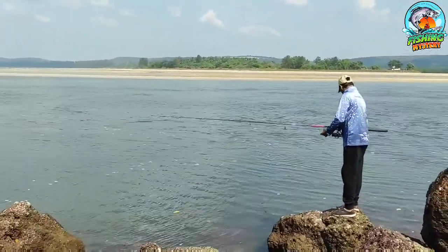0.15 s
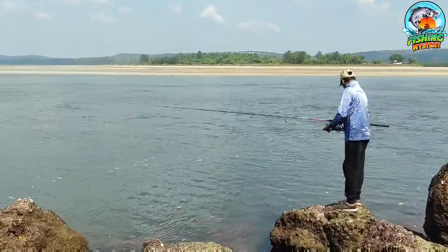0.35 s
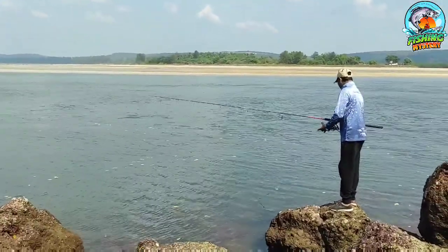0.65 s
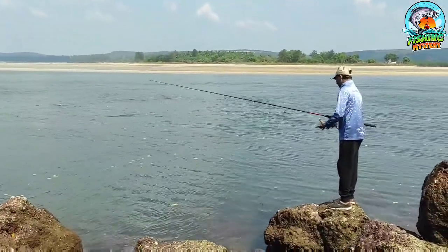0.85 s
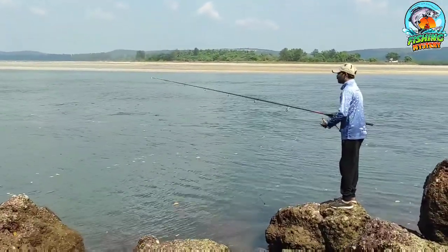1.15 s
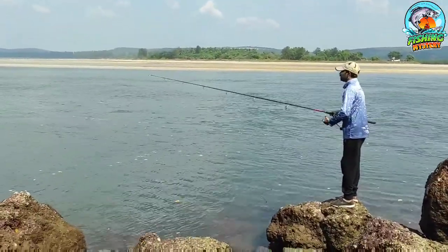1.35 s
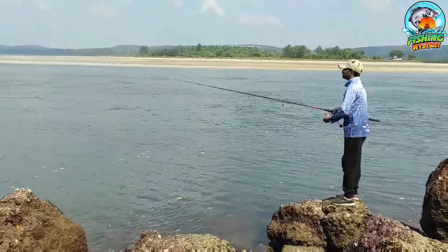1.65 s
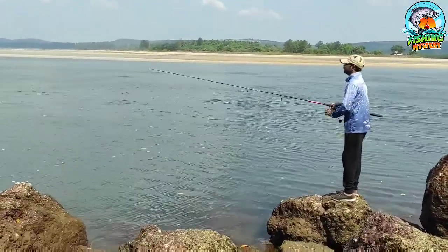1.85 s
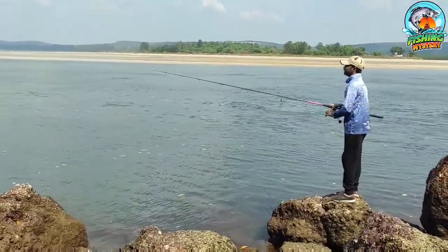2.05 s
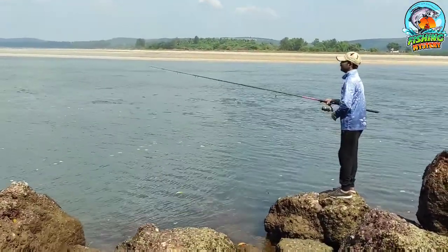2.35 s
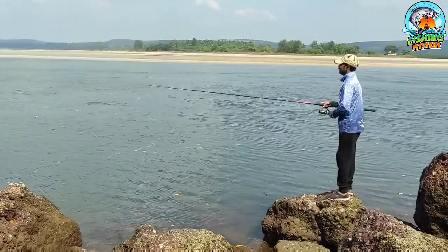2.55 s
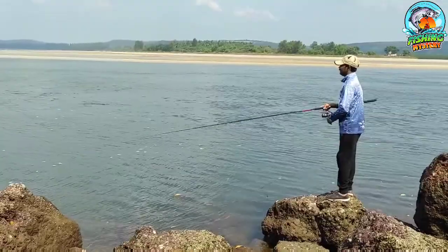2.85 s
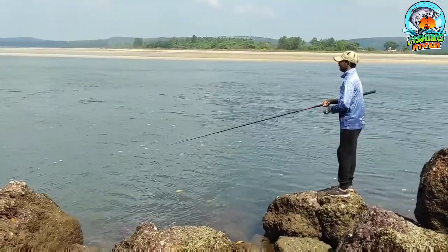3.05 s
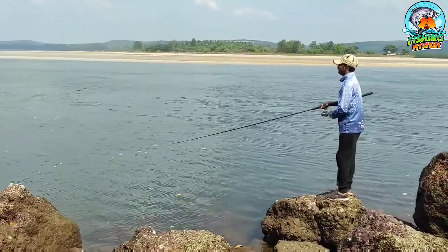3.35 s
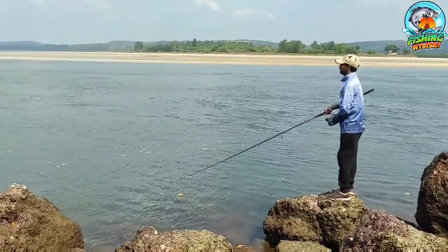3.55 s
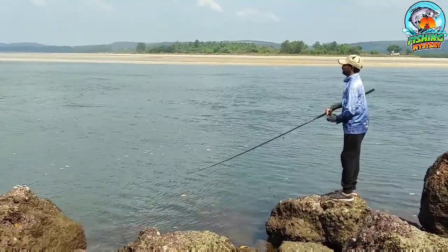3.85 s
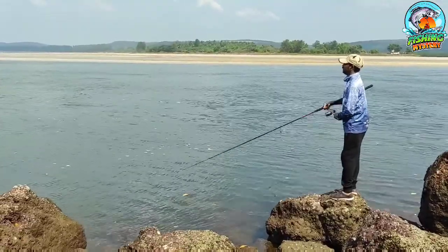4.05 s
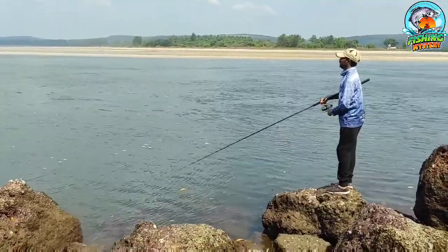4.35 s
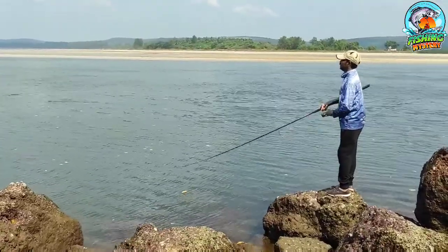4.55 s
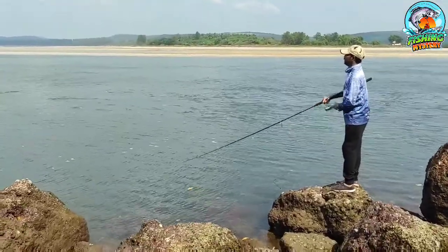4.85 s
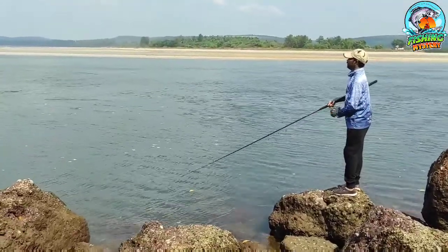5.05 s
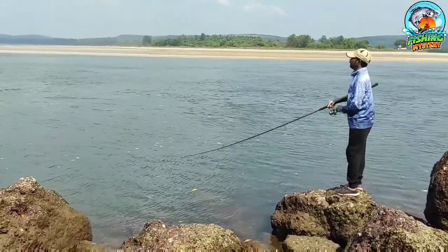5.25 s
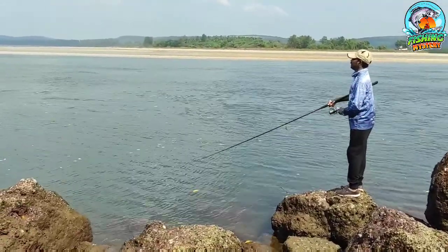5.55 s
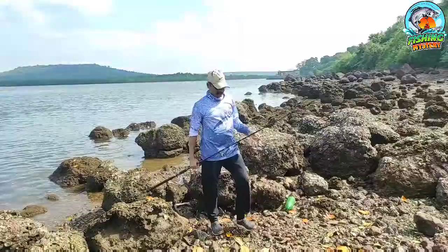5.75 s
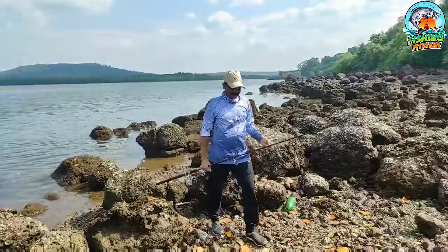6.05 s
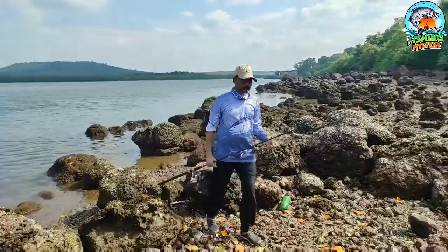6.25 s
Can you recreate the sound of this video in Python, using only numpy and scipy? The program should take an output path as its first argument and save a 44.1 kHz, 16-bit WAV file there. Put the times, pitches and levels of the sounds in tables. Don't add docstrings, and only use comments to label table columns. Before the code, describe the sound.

Wind pushes softly at a small outdoor microphone while water hushes and foam fizzes faintly. Pure, thin bird whistles sweep upward one after another, most ending in a tiny tick, with a roughened echo; fainter distant notes fall in pitch. Dry little fishing-reel clicks dot the scene. After a short silence comes a deep gust, louder wash, boot crunches on loose stones and a final hard knock.

```python
import sys
import numpy as np
from scipy import signal
from scipy.fft import rfft, irfft, next_fast_len
from scipy.io import wavfile
from scipy.ndimage import uniform_filter1d, map_coordinates

SR = 44100
rng = np.random.default_rng(int(sys.argv[2]) if len(sys.argv) > 2 else 0)


def field_ratio(decibels):
    return 10 ** (np.asarray(decibels, dtype=float) / 20)


def generate_wav(signal):
    frames = np.transpose(np.atleast_2d(signal))
    scaled = np.clip(frames, -1, 1) * 32767
    pcm = np.round(scaled).astype(np.int16)
    wavfile.write(sys.argv[1], SR, pcm)


N = 282226
TIME_S = np.arange(N) / SR

# (time [s], level [dB])
WIND = [(0, -32.5), (.3, -40.5), (.6, -36.5), (.72, -49.5), (.97, -35), (1.5, -46.5), (1.84, -34.5),
        (2.3, -35.5), (3.3, -44), (3.7, -37), (4.16, -36), (4.75, -38), (5.3, -37), (5.5, -33),
        (5.72, -41.5), (5.91, -9), (6.03, -19), (6.4, -15)]
# (frequency [Hz], density [dB per Hz])
SURGE_SPECTRUM = [(2, -30), (3, 1), (13, -1), (24, -14), (32, -23), (45, -60), (70, -120)]
# (frequency [Hz], density [dB per Hz])
RUMBLE_SPECTRUM = [(8, -120), (15, -35), (25, -2.5), (38, -7.5), (60, -7.5), (86, -17), (170, -31.5),
                   (300, -38.5), (600, -120)]
# (time [s], pressure [full scale], width [s])
PUSHES = [
    (5.728, .026, .03),
    (5.851, .075, .012),
    (5.875, .115, .013),
    (5.912, -.27, .016),
]
GUST_DB, RUMBLE_DB, RUMBLE_GROWS = 1.73, -56.5, 0.64

# (frequency [Hz], density [dB per Hz])
WASH_SPECTRUM = [(59, -23), (100, -2), (180, -7.5), (269, -2), (679, -3), (952, -9.5), (1610, -17),
                 (2070, -13.5), (3030, -17), (3590, -16.5), (4430, -30), (6200, -31.5), (8870, -35),
                 (12200, -34.5), (15500, -36)]
WASH_DB, HUSHED_DB, RECOVERED_DB = -58.5, -61, -51.5
STOP_S, RETURN_S, RECOVER_S = 5.7408, 5.86, 0.19
# (time [s], level [dB])
FOAM = [(0, -78), (.6, -85), (1.9, -81), (3.2, -78.5), (3.6, -73.5), (4.3, -74.5), (5.7, -74), (5.86, -73),
        (6.03, -67), (6.4, -65)]
# (frequency [Hz], density [dB per Hz])
FIZZ_SPECTRUM = [(2000, -62), (3000, -10), (5300, -5), (6300, 2.5), (7200, -11.5), (9000, -12),
                 (13000, -19)]

# (time [s], peak [dB], bright centre [Hz], low part [dB], length [s])
CLICKS = [(0.0345, -50, 6200, -20, 0.011), (1.741, -57, 8210, -13, 0.003),
          (1.754, -51.5, 6400, -25, 0.0024), (1.8367, -56, 7000, 1, 0.0025),
          (1.8826, -53, 6130, -15, 0.002), (1.9969, -55, 6640, -10, 0.001), (2.0188, -48, 8600, 0, 0.0016),
          (2.101, -50, 6960, -1, 0.0069), (2.718, -54.5, 7200, -21, 0.002),
          (2.9636, -50.5, 6740, 0, 0.0049), (2.974, -53.5, 6540, 0, 0.0071),
          (3.2445, -60.5, 9000, -20, .002), (3.62, -55.5, 6130, -16, 0.0053), (5.043, -58, 6400, -3, 0.003),
          (5.3672, -52.5, 5400, -7, 0.0013)]
# (time [s], peak [dB])
FAINT_CLICKS = [(.047, -62), (.5008, -65), (.516, -61.5), (.5761, -64), (.956, -62), (1.7644, -63), (2.2094, -63),
                (2.219, -62), (2.545, -60), (3.033, -60), (3.0535, -62), (3.0624, -68), (3.071, -66), (3.151, -63),
                (3.172, -66), (3.337, -65), (3.571, -59.5), (4.46, -60), (4.834, -75), (5.3223, -59), (5.689, -62)]
FAINT_HZ, FAINT_LOW_DB, FAINT_S = 6300, -1, 0.003
# (frequency [Hz], width [Hz], level [dB])
HOUSING = [(3570, 646, 10.5), (6130, 360, -1.5), (9000, 530, -12), (1500, 965, 10.5), (11700, 2700, -19)]

# (start [s], end [s], last pitch [Hz], climb [Hz per s], last level [dB])
WHISTLES = [
    (0.703, 1.01, 5205, 1200, -58),
    (1.504, 1.781, 5346, 1670, -56.5),
    (2.291, 2.556, 5313, 1595, -53),
    (3.588, 3.886, 5293, 1254, -55),
    (4.876, 5.171, 5194, 710, -55),
]
# (pitch [Hz], width [Hz], depth [dB], octave change [dB])
NULLS = [(4900, 64, 2.5, -5), (4970, 60, 17, -4), (5010, 144, 8, 1), (4920, 53, 4, 2), (4763, 41, 16, -1)]
# (time [s], level [dB], pitch [Hz], overtone [dB])
BILL_TICKS = [
    (1.0135, -58.5, 3890, -13),
    (1.784, -66, 3820, -20),
    (2.558, -58, 3810, -11),
    (3.888, -55.5, 3810, -12),
]
SCOOP_HZ, SCOOP_S, BEND_HZ, BEND_S = 393, .011, 290, .08
FLICK_HZ, FLICK_S, WAVER_HZ = 130, 0.0033, 13
SWELL_DB, ATTACK_DB, ATTACK_S, OCTAVE_DB, OCTAVE_FADE_DB = 14.5, 11, 0.0035, -88.5, 9
# (delay [s], spread [s], level [dB])
ROCKS = [
    (.035, .025, -22),
    (.085, .03, -21),
    (.14, .012, -15),
    (.185, .02, -20),
    (.255, .02, -25),
]
# (time [s], level [dB])
FACING = [(.9, -3), (1.7, 1), (2.5, 0), (3.8, -1.5), (5.1, -3.5)]

# (start [s], length [s], first pitch [Hz], last pitch [Hz], level [dB])
FAR = [
    (1.52, .19, 4250, 3100, -70),
    (3.16, .165, 4200, 3160, -71.5),
    (6.185, .075, 3000, 2330, -63),
]
FALL_CURVE, FAR_ENTRY_DB, FAR_EXIT_DB = 2.3, 9, 4

# (time [s], level [dB])
WAVELET = [
    (4.65, -82),
    (4.85, -68.5),
    (5.0, -65.5),
    (5.15, -71),
]
# (frequency [Hz], density [dB per Hz])
HOLLOW_SPECTRUM = [(400, -60), (800, -23), (1250, 0), (1700, -10), (3000, -60)]

# (time [s], peak [dB], low part [dB], length [s])
GRAVEL = [(6.105, -60, 2, .003), (6.122, -52, 0, .0045), (6.134, -45, 4, .0035), (6.145, -58, 5, .0041),
          (6.1686, -42, 6, 0.0082), (6.18, -53, 7, .0074), (6.189, -59, 15, .0027), (6.2302, -53, -8, .003),
          (6.29, -50, 0, 0.0045), (6.3085, -46, 5, .0034), (6.322, -56, -2, .004), (6.348, -59, 16, .003),
          (6.3764, -53, 11, 0.0028)]
GRAVEL_HZ = 6600
# (time [s], peak [dB], bright centre [Hz], low part [dB], length [s])
KNOCK = [
    (6.3988, -33, 4500, 3, .002),
]
# (frequency [Hz], width [Hz], level [dB])
GRIT = [(590, 380, 3.5), (1560, 1220, 0), (3190, 570, 2), (5640, 320, -9.5), (8700, 4100, -18.5)]
# (time [s], pitch [Hz], level [dB])
PING = [
    (6.29, 10700, -68),
    (6.293, 10700, -62),
    (6.301, 10600, -80),
]

# (frequency [Hz], level [dB])
WHINE = [(11601, -105), (13200, -104), (14002, -106), (14400, -105), (14799, -106), (15202, -108)]
# (time [s], gain [dB])
FADE = [
    (5.76, -60),
    (5.79, -23),
    (5.836, -19),
    (5.846, 0),
]
# (time [s], change [dB])
GAIN_STEPS = [(5.854, -2), (5.8592, -.25), (5.8646, -1.1), (5.8726, -.45), (5.8834, -1), (5.8927, -1.5),
              (5.9034, -.6), (5.9127, -.55), (5.9233, -.65)]


def unit(x):
    return x / np.sqrt(np.mean(x ** 2) + 1e-20)


def along(points, hz):
    f, v = np.transpose(points)
    return np.interp(np.log(hz + 1), np.log(f + 1), v)


def wobble(rate_hz):
    return map_coordinates(rng.standard_normal(N // 100), [TIME_S * rate_hz])


def coloured(x, spectrum):
    m = next_fast_len(N + SR)
    gain = field_ratio(along(spectrum, np.fft.rfftfreq(m, 1 / SR)))
    return unit(irfft(rfft(x, m) * gain, m)[:N])


def patchy(depth_db):
    z = signal.stft(rng.standard_normal(N), nperseg=512)[2]
    field = uniform_filter1d(rng.standard_normal(z.shape), 6, 0)
    field = uniform_filter1d(field, 10, 1)
    return signal.istft(z * field_ratio(depth_db * unit(field)), nperseg=512)[1][:N]


def wind():
    surge_db = np.interp(TIME_S, *np.transpose(WIND)) + GUST_DB * wobble(5.4)
    rumble_db = RUMBLE_DB + RUMBLE_GROWS * (surge_db + 37) + 1.75 * wobble(9)
    lull = 1 - (np.abs(TIME_S - 5.82) < .12) * .95
    lull = uniform_filter1d(lull, size=2000)
    surge = lull * field_ratio(surge_db) * coloured(rng.standard_normal(N), SURGE_SPECTRUM)
    turbulence = coloured(rng.standard_normal(N), RUMBLE_SPECTRUM)
    rumble = np.sqrt(lull) * field_ratio(rumble_db + 1.5 * wobble(4.5)) * turbulence
    pushes = sum(size * np.exp(-.5 * ((TIME_S - s) / width_s) ** 2) for s, size, width_s in PUSHES)
    return surge + rumble + pushes


def wash():
    return_db = np.interp(TIME_S, [RETURN_S, RETURN_S + RECOVER_S], [HUSHED_DB, RECOVERED_DB])
    level_db = np.where(TIME_S < STOP_S, WASH_DB, return_db)
    return field_ratio(level_db + 0.41 * wobble(6.3)) * coloured(patchy(depth_db=0.7), WASH_SPECTRUM)


def bubbles(rate_hz, centre_hz, spread, cycles):
    draw = rng.random((4000, 3))
    clock = np.cumsum(rate_hz / SR * field_ratio(4.4 * wobble(12)))
    start = np.searchsorted(clock, np.cumsum(-np.log(draw[:, 0])))
    hz = centre_hz * np.exp(spread * rng.standard_normal(4000))[:, None]
    size = field_ratio(-2.6 * np.log(draw[:, 1:2]))
    t = np.arange(400) / SR
    life = t * hz / (cycles * (0.17 + draw[:, 2:]))
    grains = size * life * np.exp(-3 * life) * np.sin(2 * np.pi * hz * t)
    index = start[:, None] + np.arange(400)
    return unit(np.bincount(index.ravel(), grains.ravel(), N + 401)[:N])


def fizz():
    level_db = np.interp(TIME_S, *np.transpose(FOAM)) + 1.8 * wobble(8)
    froth = coloured(patchy(depth_db=2), FIZZ_SPECTRUM)
    bursts = bubbles(500, centre_hz=6500, spread=.14, cycles=22)
    return field_ratio(level_db - 6) * (froth + field_ratio(-1) * bursts)


def snaps(table, modes, low_hz, low_octaves, bright_octaves):
    out = np.zeros(N + 2048)
    t = np.arange(2048) / SR - .004
    f = np.fft.rfftfreq(2048, 1 / SR)
    ring = 0
    for k, (c, w, db) in enumerate(modes):
        ring = ring + (-1) ** k * field_ratio(db) * 1j * f * w / (c * c - f * f + 1j * f * w)

    def band(hz, octaves):
        return np.exp(-.5 * (np.log2((f + 1) / hz) / octaves) ** 2)

    for s, db, hz, low_db, length_s in table:
        burst = rng.standard_normal(2048) * np.exp(-t / length_s) * np.clip(t / .0005, 0, 1)
        bands = np.array([band(hz, bright_octaves), band(low_hz, low_octaves)])
        parts = irfft(rfft(burst) * ring * bands)
        bright, low = parts / np.abs(parts).max(axis=1, keepdims=True)
        out[round((s - .004) * SR):][:2048] += field_ratio(db + 2) * (bright + field_ratio(low_db) * low)
    return out[:N]


def tackle():
    faint = [(s, db, FAINT_HZ, FAINT_LOW_DB, FAINT_S) for s, db in FAINT_CLICKS]
    return snaps(CLICKS + faint, HOUSING, low_hz=3340, low_octaves=0.45, bright_octaves=0.4)


def note(rows, flutter_db):
    s, hz, *levels = np.transpose(rows)
    glide_hz = uniform_filter1d(np.interp(TIME_S, s, hz), size=round(SR * (s[-1] - s[0]) / 20))
    phase = 2 * np.pi * np.cumsum(glide_hz) / SR
    edge = np.clip(np.minimum(TIME_S - s[0], s[-1] - TIME_S) / 0.0012, 0, 1)
    tone = sum(field_ratio(np.interp(TIME_S, s, db)) * np.sin((k + 1) * phase) for k, db in enumerate(levels))
    return np.sqrt(2) * edge * field_ratio(flutter_db * wobble(60)) * tone


def whistle(s, end_s, top_hz, climb, db, null):
    null_hz, null_width_hz, null_db, octave_change_db = null
    length_s = end_s - s
    t = np.linspace(0, length_s, 80)
    waver = WAVER_HZ * map_coordinates(rng.standard_normal(12), [t / length_s * 9])
    hz = top_hz + waver - climb * (length_s - t)
    hz = hz - SCOOP_HZ * np.exp(-t / SCOOP_S) - BEND_HZ * np.exp(-t / BEND_S)
    hz = hz + FLICK_HZ * np.exp((t - length_s) / FLICK_S)
    attack = ATTACK_DB * np.exp(-t / ATTACK_S)
    dip = null_db * np.exp(-.5 * ((hz - null_hz) / null_width_hz) ** 2)
    level = db - SWELL_DB * (1 - t / length_s) - attack - dip
    octave_fade = OCTAVE_FADE_DB * np.abs(2 * t / length_s - 1) ** 3
    octave = OCTAVE_DB + octave_change_db - attack - octave_fade
    return np.transpose([s + t, hz, level, octave])


def wader():
    song = sum(note(whistle(*call, null), flutter_db=0.9) for call, null in zip(WHISTLES, NULLS))
    for s, db, hz, over_db in BILL_TICKS:
        octave_db = db + over_db
        rows = [(s - .001, hz, db, octave_db),
                (s + .002, .95 * hz, db, octave_db),
                (s + .005, .85 * hz, db - 9, octave_db - 6)]
        song = song + note(rows, flutter_db=0)
    return song


def rocks(song):
    x = song * field_ratio(np.interp(TIME_S, *np.transpose(FACING)))
    t = np.arange(SR // 2) / SR
    echo = 0
    for delay_s, spread_s, db in ROCKS:
        face = np.exp(-.5 * ((t - delay_s) / spread_s) ** 2) * rng.standard_normal(len(t))
        flutter = field_ratio(db + 2.4 * wobble(160))
        echo = echo + flutter * signal.fftconvolve(x, face / np.linalg.norm(face))[:N]
    return echo


def slide(s, length_s, from_hz, to_hz, db):
    u = np.linspace(0, 1, 40)
    hz = to_hz + (from_hz - to_hz) * (1 - u) ** FALL_CURVE
    level = db - FAR_ENTRY_DB * (1 - u) ** 3 - FAR_EXIT_DB * u ** 12
    return np.transpose([s + length_s * u, hz, level])


def far_bird():
    return field_ratio(2.6 * wobble(150)) * sum(note(slide(*row), flutter_db=2) for row in FAR)


def wavelet():
    level_db = np.interp(TIME_S, *np.transpose(WAVELET), left=-120, right=-120)
    return field_ratio(level_db) * coloured(patchy(depth_db=3), HOLLOW_SPECTRUM)


def gravel():
    crunch = [(s, db, GRAVEL_HZ, low_db, length_s) for s, db, low_db, length_s in GRAVEL]
    stones = snaps(crunch + KNOCK, GRIT, low_hz=1500, low_octaves=1.3, bright_octaves=.7)
    return stones + note(PING, flutter_db=0)


def scene():
    shore = wind() + wash() + fizz()
    song = wader()
    birds = song + rocks(song) + far_bird()
    return (shore + tackle() + birds + wavelet() + gravel())[None]


def roll_off(x):
    return signal.sosfilt(signal.butter(12, 15480, fs=SR, output="sos"), x)


def record(dry):
    whine = sum(np.sqrt(2) * field_ratio(db) * np.sin(2 * np.pi * hz * TIME_S) for hz, db in WHINE)
    hiss = field_ratio(np.where(TIME_S < STOP_S, -90, -78)) * rng.standard_normal(N)
    fade_db = np.interp(TIME_S, *np.transpose(FADE))
    steps_db = uniform_filter1d(sum(db * (TIME_S > s) for s, db in GAIN_STEPS), size=2)
    gain = np.where(TIME_S < STOP_S, 1, field_ratio(fade_db + steps_db + 1))
    return roll_off((dry + whine + hiss) * gain)


dry = scene()
out = record(dry)
generate_wav(out)
```